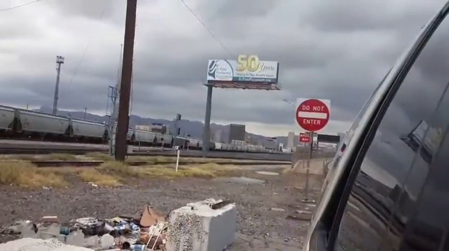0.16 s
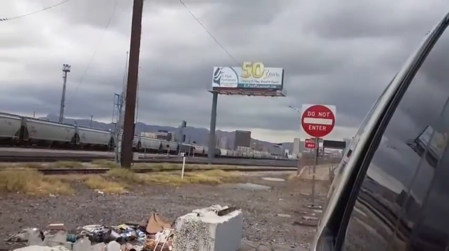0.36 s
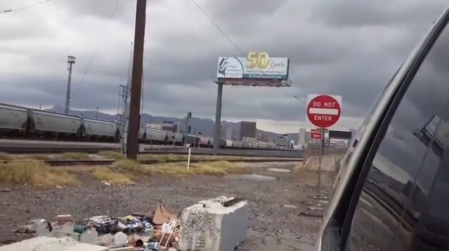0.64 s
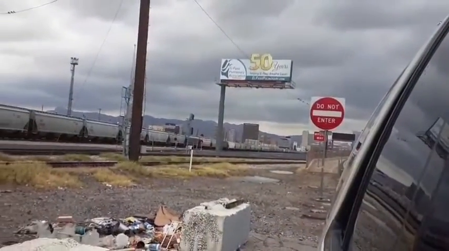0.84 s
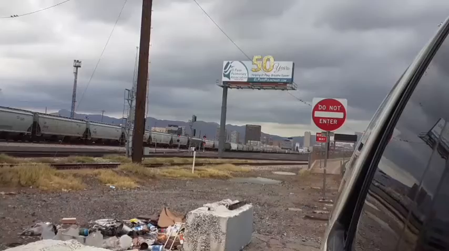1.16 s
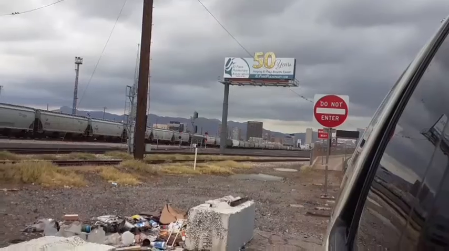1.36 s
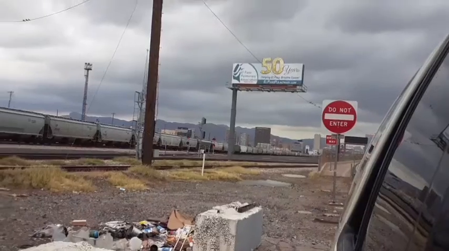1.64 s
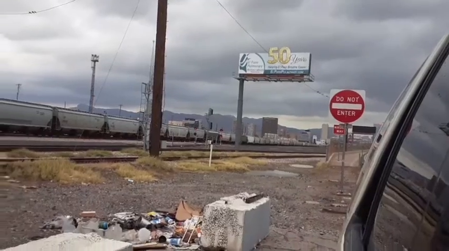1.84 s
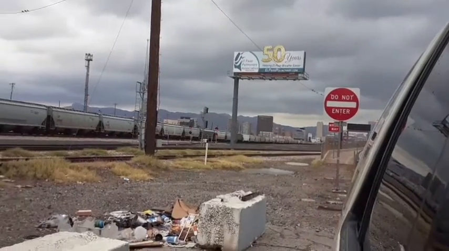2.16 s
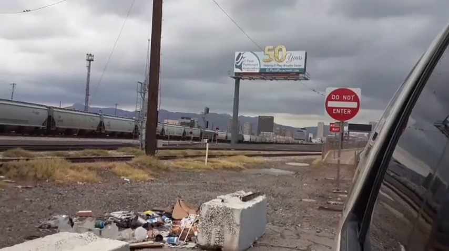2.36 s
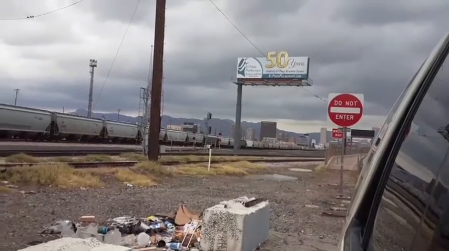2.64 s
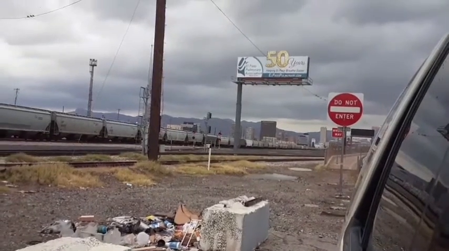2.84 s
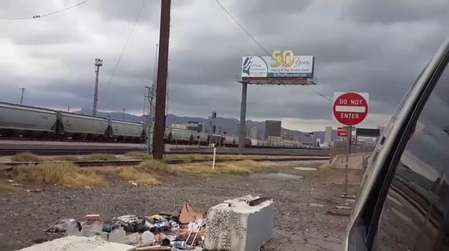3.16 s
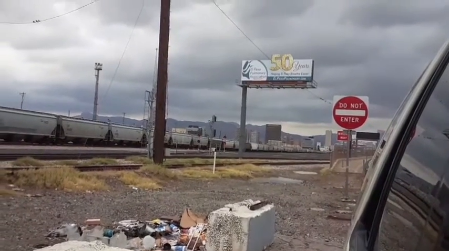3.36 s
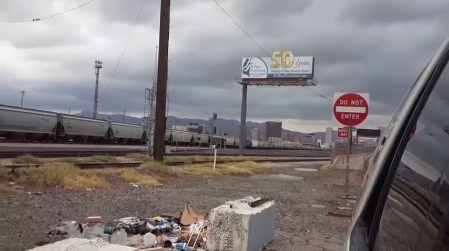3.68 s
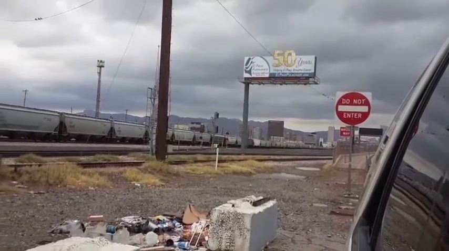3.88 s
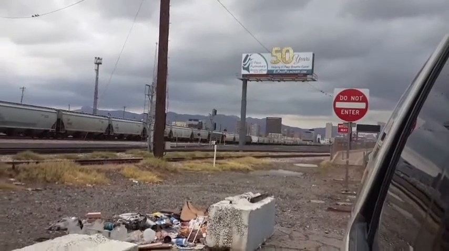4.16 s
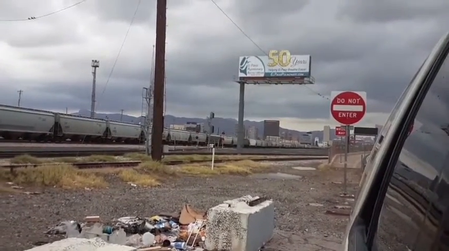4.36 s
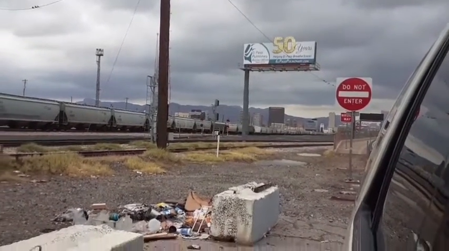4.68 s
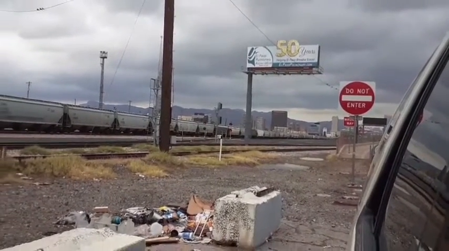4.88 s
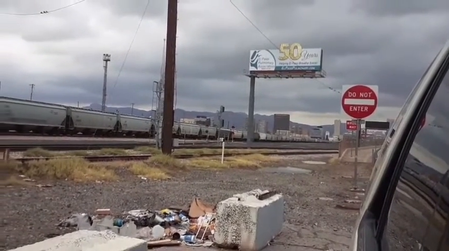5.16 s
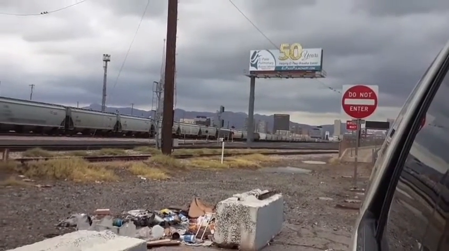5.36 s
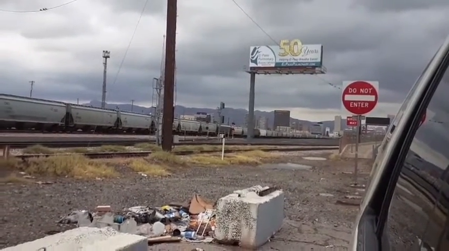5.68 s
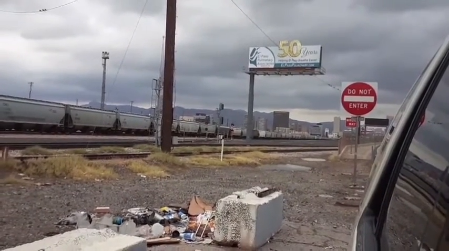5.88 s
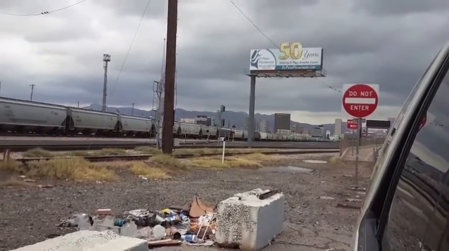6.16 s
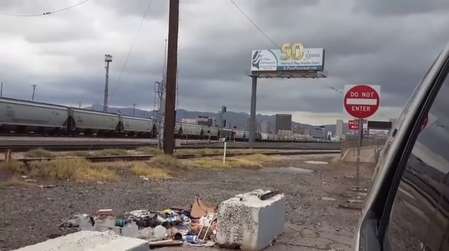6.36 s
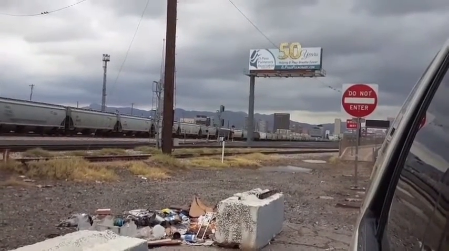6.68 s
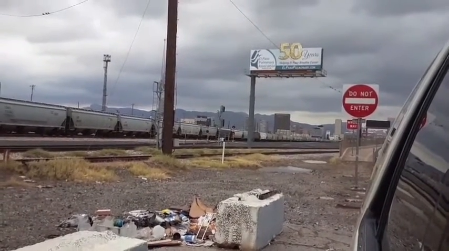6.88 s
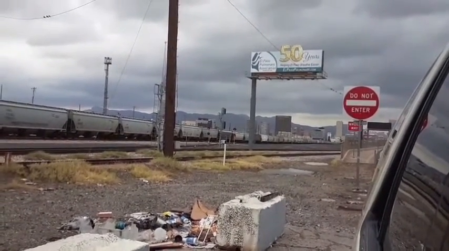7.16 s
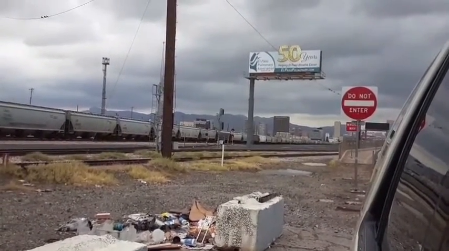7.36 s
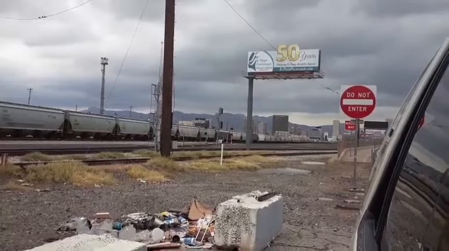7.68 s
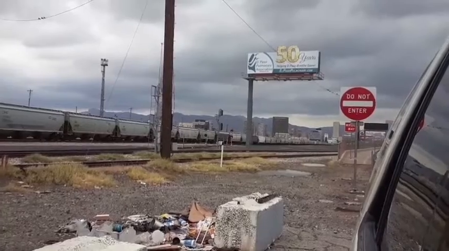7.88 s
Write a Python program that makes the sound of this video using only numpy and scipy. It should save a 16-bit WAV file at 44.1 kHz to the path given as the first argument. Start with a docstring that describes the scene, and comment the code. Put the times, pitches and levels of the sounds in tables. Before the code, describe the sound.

A freight train rolls slowly by with a high, steady wheel squeal, over a low rumble and light wind on the microphone.

```python
"""Freight train wheel squeal

A long freight train rolls slowly through a yard, heard from the open window of a car. Stick-slip
friction drives one wheel into a high, steady squeal that turns rough as its flange grinds; other
wheels ring and chirp faintly. Under it lie the rolling noise of the wagons, turbulent gusts on
the microphone and, at first, the fading hum of the car's engine."""
import sys
import numpy as np
from scipy import signal
from scipy.fft import rfft, irfft, next_fast_len
from scipy.io import wavfile
from scipy.ndimage import uniform_filter1d

SR = 44100
rng = np.random.default_rng(int(sys.argv[2]) if len(sys.argv) > 2 else 0)


def put_to_file(sound):
    """Save the sound as 16-bit audio at rate SR, in the file named by the first command-line argument."""
    columns = np.atleast_2d(sound).T  # one column per channel
    safe = np.clip(columns, -1, 1)
    whole_steps = np.round(safe * 32767)
    wavfile.write(sys.argv[1], SR, whole_steps.astype(np.int16))


N = 354117
TIME = np.arange(N) / SR

# rubbing of the flange on the rail: t/s, relative level/dB
FLANGE_RUBBING = [(0, -60), (0.7, -53), (1.35, -57.5), (1.7, -59), (2.05, -58), (2.4, -63), (2.88, -61),
                  (3.0, -56.5), (3.15, -62.5), (3.42, -62.5), (3.58, -54), (4.0, -62.0), (4.3, -60.5),
                  (5.05, -51.5), (5.65, -56), (6.2, -50.5), (6.5, -52), (6.85, -53.5), (7.4, -58.0),
                  (8.03, -67.5)]
# coherence of the train's noise between the ears: f/Hz, coherence (0-1)
EAR_COHERENCE = [(50, 0.1), (300, 0.46), (700, 0.76), (1400, 0), (3000, 0.18), (7000, 0.19), (15000, 0.6)]


def squeal():
    """Self-excited vibration: stick-slip locks onto one wheel mode; rough slip adds a subharmonic."""
    # three bouts of squeal, each swelling and dying away: t/s, relative level/dB
    first_bout = [(0, -39), (0.23, -35), (0.28, -25.5), (0.8, -37.5), (1.0, -22.5), (1.45, -19),
                  (1.72, -25), (2.15, -20), (2.4, -34.5), (2.68, -50), (2.89, -41)]
    second_bout = [(2.97, -27), (3.6, -25), (3.8, -32), (4.0, -34.5), (4.12, -36), (4.37, -34.5)]
    third_bout = [(4.42, -32.5), (4.72, -22), (5.33, -28.5), (5.44, -34), (5.88, -32.5), (5.95, -28.5),
                  (6.38, -20.5), (6.48, -29), (6.65, -18.5), (7.28, -30), (7.58, -34.5), (7.66, -41),
                  (8.03, -54.5)]
    # unevenness of the slip: t/s, roughness (0-1)
    slip_roughness = [(0, 1), (.6, 0.7), (.85, 0.48), (1.05, 0.26), (1.45, 0.13), (2.2, 0.26), (2.45, 0.61),
                      (2.85, 0.6), (3.0, 0.19), (3.35, 0.23), (3.6, 0.54), (4.2, 0.49), (4.85, 0.4),
                      (5.3, 0.53), (6.3, 0.38), (6.8, 0.59), (7.5, 0.55)]
    # wandering phase of the squeal between the ears: t/s, lead of the left ear/rad
    ear_phase = [(0, 2.5), (.7, -.5), (1.15, 1.32), (1.27, 0.65), (1.9, 0.73), (3.0, 0.46), (3.6, 0.8),
                 (4.2, 0.56), (4.55, 0), (4.85, -1), (5.2, -2), (5.8, -0.5), (6.05, 2), (6.4, 1.3),
                 (6.65, 3.5), (7.3, 1.55), (8.03, -0.5)]
    mode_hz, wobble_hz, ceiling_db = 4522, 2.2, -13
    level_db, = curves(first_bout + second_bout + third_bout)
    rubbing_db, = curves(FLANGE_RUBBING)
    rough, = curves(slip_roughness)
    lead, = curves(ear_phase)
    flare_db, octave_db, half_db, fifth_db = flange_bites()

    def growth(db, per_level, per_rubbing, per_rough):
        """Nonlinear friction: a partial's gain follows the wheel's swing, rubbing and roughness."""
        change_db = per_level * (level_db + 24) + per_rubbing * (rubbing_db + 57)
        return amp(db + change_db + per_rough * (rough - .5))

    octave = growth(octave_db - 51.5, per_level=.66, per_rubbing=1.16, per_rough=-2)
    half = growth(half_db - 53.5, per_level=.28, per_rubbing=.97, per_rough=7)
    fifth = growth(fifth_db - 60, per_level=-.2, per_rubbing=2.64, per_rough=.5)

    turns = np.cumsum(mode_hz + wobble_hz * flutter(2.18, steep=1.46).real) / SR
    lead = lead + .7 * rough * flutter(4, steep=3).real
    ear_turns = turns + np.array([[.5], [-.5]]) * lead / (2 * np.pi)
    tone_rough = np.minimum(rough * 1.1, .8)
    tone = partial(ear_turns, tone_rough, width_hz=18, scatter=.75, steep=2.3, cap=.5, window=4000)
    swing_db = np.minimum(level_db + 5 + flare_db, ceiling_db) + grip_loss(rough)
    fundamental = amp(swing_db) * tone * panned(4.5)

    second = partial(2 * turns, rough * 2, width_hz=18, scatter=.5, steep=1.4)
    third = partial(3 * turns, rough * 2, width_hz=16, scatter=.4, steep=1.6)
    harmonics = octave * (second + amp(-7) * rough * third) * panned(1.8)

    # the half pitch and its odd multiples
    sputter = amp(2.2 * flutter(22, steep=3).real)
    odd = half * sputter * partial(turns / 2, .92, width_hz=11, scatter=.3, steep=1.25, window=12000)
    odd += fifth * partial(1.5 * turns, .92, width_hz=11, scatter=.5, steep=1.4) * panned(3)
    odd += fifth * amp(-10.5) * partial(2.5 * turns, .95, width_hz=14, scatter=.4, steep=1.6)
    return fundamental + harmonics + odd


def partial(turns, rough, width_hz, scatter, steep, cap=0, window=9000):
    """Interference: a tone modulated by rough slip meets wagon echoes that differ at each ear."""
    rough = np.clip(rough, 0, 1)
    direct = np.sqrt(1 - rough ** 2) + rough * flutter(width_hz, steep)
    echoes = np.array([flutter(width_hz * 1.45, steep) for ear in range(2)])
    envelope = direct + scatter * rough * echoes
    envelope /= np.sqrt(1 + abs(cap * envelope) ** 2)  # friction caps a wide swing
    power = uniform_filter1d((abs(envelope) ** 2).mean(0), window)
    envelope /= np.sqrt(power + 1e-3)  # the rubbing, not the flutter, sets the loudness
    return np.sqrt(2) * (envelope * np.exp(2j * np.pi * turns)).real


def flange_bites():
    """Transient forcing: each bite briefly shifts the levels of the tone and its partials, in dB."""
    # t/s, half width/s, level change/dB at 1, 2, 1/2 and 3/2 times the squeal frequency
    bites = [(0.588, 0.031, 5, 10, 10, 8), (0.686, 0.038, 4, 0, 0, 5), (0.722, .13, 13, 6, 12, -3.5),
             (0.893, 0.026, 9, -14, 4, -3), (1.023, 0.045, 6, -10, 0, -16),
             (1.373, .11, 1, 10.5, -0.5, -1.5), (2.118, 0.04, 13, -5, -6, -6),
             (3.042, 0.074, 5.5, 6.5, 2, 10), (3.523, 0.033, 4.5, 3, 5, 8), (3.622, 0.017, 3.5, 1, 3, -6),
             (3.971, 0.05, 8.5, -3, 9.5, 0), (4.425, 0.036, 5.5, 10, 0, 12),
             (4.577, 0.072, -2.5, 3, 12, 11), (4.847, 0.026, 11, 3, 3, 0), (5.075, 0.039, 6, -8, 11.5, -4),
             (5.25, 0.063, 8, -3, 8.5, 0), (5.377, 0.032, 3.5, -3, 13.5, -6), (5.957, 0.015, 6, 2, 2, 3),
             (6.14, 0.062, 6, 8, -1, -2), (6.278, 0.019, 7, -1, 6, -11), (6.386, .025, 3.5, 2.5, -10, -6),
             (6.818, 0.04, 3, 6, 0, 8), (6.877, 0.013, 7, 3, 1, 1), (7.159, 0.021, 8, 2, 6, 8),
             (7.253, 0.041, 2.5, -2, 0, -2)]
    return sum(np.outer(lifts, np.exp(-((TIME - t) / width) ** 2)) for t, width, *lifts in bites)


def grip_loss(rough):
    """Interrupted excitation: the tone dips, in dB, at each loss of grip and stutters in rough slip."""
    # the wheel loses its grip and catches again: t/s, depth/dB
    grip_breaks = [(0.654, 9.5), (.8, 8), (1.19, 7), (2.335, 14), (3.447, 13), (3.593, 25), (4.38, 18),
                   (4.836, 19), (5.119, 14), (5.9, 7), (6.007, 10), (6.238, 12), (6.44, 15), (6.776, 15),
                   (6.852, 14), (6.974, 11), (7.126, 8), (7.319, 24), (7.404, 11)]
    breaks_db = sum(db * notch(t, fall_s=.014, rise_s=.014) for t, db in grip_breaks)
    rough_threshold, mean_stutter_db = .3, 8
    stutters_per_s = 17 * (rough - rough_threshold)
    chance, depth = rng.random((2, N))
    stutters = (chance < stutters_per_s / SR) * (.5 + depth)
    dip = notch(.018, fall_s=.006, rise_s=.016)[:SR // 10]
    return -breaks_db - mean_stutter_db * signal.oaconvolve(stutters, dip)[:N]


def flange_scrape():
    """Resonance: broadband friction at the flange stirs the wheel's other modes, which ring in turn."""
    # lower and upper wheel modes: f/Hz, bandwidth/Hz, relative level/dB
    lower_modes = [(2195, 40, 7), (2300, 110, 7), (2660, 90, 4), (3461, 12, 7), (4380, 120, 11),
                   (4667, 16, 19), (4786, 16, 13), (5227, 50, 7), (5680, 150, 3), (5949, 25, 8),
                   (7340, 100, 5), (7754, 40, 10), (7966, 16, 11)]
    upper_modes = [(8740, 130, 7), (8880, 60, 9), (9200, 160, 5), (9482, 40, 8), (9820, 170, 6),
                   (10600, 120, 1), (11170, 200, 4), (11780, 130, 5), (12258, 25, 5), (12520, 200, 0),
                   (13400, 110, 6), (14680, 200, -1)]
    # broadband part of the rubbing: f/Hz, relative level/dB
    friction_spectrum = [(1500, -21), (2500, 2), (4500, -1), (6200, -0.5), (8000, -2.5), (10500, -8),
                         (13000, -3), (16000, -12)]

    def colour(hz):
        """Power summation: Lorentzian resonance peaks stand on the friction spectrum."""
        peaks = sum(amp(db) ** 2 / (1 + (2 * (hz - f) / width) ** 2)
                    for f, width, db in lower_modes + upper_modes)
        return np.sqrt(peaks + amp(spectrum(friction_spectrum, hz)) ** 2)

    level_db, = curves(FLANGE_RUBBING)
    scrape = noise(colour, lambda hz: spectrum(EAR_COHERENCE, hz))
    frames = signal.stft(scrape, nperseg=2048)[2]
    # random patches in frequency and time favour one mode, then another
    patches = uniform_filter1d(rng.standard_normal(frames.shape[1:]), size=3, axis=0)
    patches = unit_rms(uniform_filter1d(patches, size=7, axis=1))
    ringing = unit_rms(signal.istft(frames * amp(5 * patches), nperseg=2048)[1][:, :N])
    chatter_db = 2.1 * flutter(18).real
    return amp(level_db + 6.5 + chatter_db) * ringing * panned(1.8)


def other_wheels():
    """Friction-excited modes: faint rings swell and die as other flanges touch the rail."""
    # start t/s, end t/s, centre f/Hz, glide/Hz, flutter width/Hz, relative peak level/dB
    rings = [(-.5, 1.2, 2615, 0, 8, -46), (.9, 2.3, 2616, 0, 9, -51), (1.45, 2.0, 2491, 0, 6, -56),
             (2.5, 2.74, 5300, 0, 350, -57), (2.73, 2.83, 2665, 30, 16, -48),
             (4.31, 4.45, 2660, 20, 18, -50), (5.26, 5.4, 2700, 20, 22, -50),
             (6.06, 6.32, 2680, 10, 16, -49), (6.77, 7.3, 2700, 0, 40, -53), (6.98, 7.34, 2491, 0, 6, -51),
             (.2, 2.4, 3983, 0, 5, -58), (4.4, 7.4, 3980, 0, 5, -62), (3.3, 8.6, 4044, 0, 8, -61),
             (5.6, 6.9, 13092, 0, 4, -63)]
    out = np.zeros((2, N))
    for start, end, hz, glide_hz, width_hz, db in rings:
        on = (TIME > start) & (TIME < end)
        progress = (TIME[on] - start) / (end - start)
        carrier = np.exp(2j * np.pi * np.cumsum(hz + glide_hz * (progress - .5)) / SR)
        shared, left, right = (flutter(width_hz)[on] for _ in range(3))
        envelope = unit_rms(shared + 1.4 * np.array([left, right]))
        swell = np.sqrt(2 * np.sin(np.pi * progress))
        out[:, on] += amp(db + 2.5) * swell * (envelope * carrier).real
    return out


def wagons():
    """Incoherent sources: many distant rolling wheels sum to a rumble over the yard's faint hiss."""
    # rolling noise: t/s, relative level/dB
    rolling_level = [(0.0, -37.5), (0.02, -41.5), (0.13, -37.5), (1.45, -44.5), (3.13, -44.5), (4.61, -42),
                     (4.7, -44), (5.48, -40.5), (6.84, -44), (8.03, -42)]
    # its spectral density: f/Hz, relative level/dB
    rolling_spectrum = [(20, -16), (45, -39), (70, -22), (130, -8), (220, -1), (350, 6.5), (550, 3),
                        (850, 4.5), (1080, -1.5), (1300, -2), (1900, -7), (2500, -8), (3200, -18),
                        (4200, -8.5), (6000, -23.5), (16000, -62)]
    # its left-right balance, with the deep bass weak on the left: f/Hz, left minus right level/dB
    balance = [(40, -24), (200, -19.5), (270, -1.5), (340, 10.5), (600, 3.5), (850, 1), (1100, 1),
               (2000, 1), (16000, -3)]
    # hiss of the open yard: f/Hz, relative level/dB
    hiss_spectrum = [(500, -4), (3000, 1.5), (5200, -8), (7000, -5), (16000, -8)]
    level_db, = curves(rolling_level)
    rumble = noise(lambda hz: amp(spectrum(rolling_spectrum, hz)) * panned(spectrum(balance, hz)),
                   lambda hz: spectrum(EAR_COHERENCE, hz), lag_s=.00006)
    hiss = noise(lambda hz: amp(spectrum(hiss_spectrum, hz)), coherence=lambda hz: .7)
    sway_db = 1.6 * flutter(14).real
    return amp(level_db + 4.5 + sway_db) * rumble + amp(-59) * hiss


def wind():
    """Turbulence: low buffeting at each microphone port; gusts swell it and shed brighter eddies."""
    # wind on the microphone, much quieter on the left after about 3 s: t/s, left, right level/dB
    breeze_level = [(0, -22, -22), (.5, -26.5, -28), (.9, -40.5, -27), (1.6, -32.5, -34), (2.5, -33, -31),
                    (3.2, -55, -28.5), (3.5, -48, -28.5), (4.5, -59, -28.5), (5.4, -59, -35.5),
                    (6.4, -62, -36.5), (8.03, -46, -35.5)]
    # spectral densities of buffeting and eddies: f/Hz, relative level/dB
    buffet_spectrum = [(15, -44), (30, -24.5), (48, -16), (64, 3.5), (85, -2), (120, -2.5), (180, -7),
                       (260, -14), (400, -23.5), (800, -57.5), (3000, -65.5)]
    eddy_spectrum = [(30, -18), (100, -7), (200, 2.5), (350, 0), (550, -7), (800, -15), (1500, -34.5),
                     (5000, -64.5)]
    # t/s, half width/s, relative buffet and eddy level/dB, eddy left minus right level/dB
    gusts = [(0.058, 0.016, -37, -26, 6), (0.13, 0.0067, -26, -19.5, 7), (0.25, 0.053, -23, -47, 0),
             (0.475, 0.042, -24, -53, 0), (.74, 0.036, -28, -39, 6), (0.96, 0.014, -48, -27, 6),
             (1.217, 0.017, -29, -40, 2), (2.222, 0.01, -27.5, -59, -2), (2.473, 0.032, -31, -36, 7),
             (2.71, 0.019, -28.5, -54, 2), (2.925, 0.034, -42, -32.5, 7), (3.03, 0.018, -26, -34, 3),
             (3.178, 0.02, -29, -38, 3), (3.733, 0.0086, -27, -24, 42), (3.887, 0.064, -48, -33, 6),
             (4.123, 0.023, -46, -29.5, -2), (4.207, 0.015, -42, -27, 4), (4.282, 0.033, -31.5, -33.5, 5),
             (4.47, 0.073, -50, -30, 2), (4.697, 0.038, -38, -36.5, 8), (4.983, 0.01, -27, -19.5, 2),
             (5.111, 0.018, -28, -28.5, 2), (5.225, 0.0097, -31, -44, 4), (5.527, 0.02, -37, -27.5, -8),
             (5.625, 0.049, -26, -44, 8), (5.839, 0.0087, -28, -22, -2), (5.872, 0.01, -31, -22, -1),
             (6.183, 0.018, -31, -44, -4), (6.684, 0.0089, -33, -29, -18), (6.981, 0.0099, -30, -39, 8),
             (7.17, 0.02, -36, -42, 9), (7.623, 0.018, -35, -50, 0), (7.89, 0.023, -33, -52, 0)]
    linger_s = .0062  # widens each gust's buffet
    left_db, right_db = curves(breeze_level)
    waver_db = .5 * flutter(4, steep=3.1).real
    breeze = amp([left_db + waver_db, right_db])
    lumps_db = 3.5 * flutter(34).real
    buffet_power = breeze ** 2
    eddy_gain = breeze * amp(-14 + 1.93 * lumps_db)
    for t, width, buffet_db, eddy_db, side_db in gusts:
        buffet_power += amp(buffet_db) ** 2 * np.exp(-((TIME - t) / (width + linger_s)) ** 2)
        eddy_gain += amp(eddy_db - 2.7) * panned(side_db) * np.exp(-.5 * ((TIME - t) / width) ** 2)
    buffet = noise(lambda hz: amp(spectrum(buffet_spectrum, hz)), coherence=lambda hz: .77)
    eddies = noise(lambda hz: amp(spectrum(eddy_spectrum, hz)), coherence=lambda hz: .39)
    return np.sqrt(buffet_power) * amp(lumps_db - 1.23) * buffet + eddy_gain * eddies


def car_engine():
    """Periodic excitation: harmonics of the engine's firing rate waver and sink away."""
    # t/s, firing f/Hz, relative level/dB
    firing = [(0, 63, -37), (.3, 63, -32), (.5, 62, -28), (.7, 61, -31), (.85, 61, -39), (1.2, 63, -38),
              (1.5, 63, -46), (2.5, 64, -50), (8.03, 64, -60)]
    # engine orders: multiple of the firing rate, relative level/dB
    orders = [(1, 0), (2, -5), (3, -9), (4, 2), (5, -15), (6, -11)]
    firing_hz, level_db = curves(firing)
    turns = np.cumsum(firing_hz) / SR
    hum = np.zeros(N)
    for order, db in orders:
        waver = 1 + .28 * flutter(4)
        hum += amp(db) * (waver * np.exp(2j * np.pi * (order * turns + rng.random()))).real
    return amp(level_db - 3.7) * hum


def flutter(width_hz, steep=1.23, size=16384):
    """Random modulation: a slow complex envelope that broadens a carrier into a soft-skirted line."""
    hz = np.fft.fftfreq(size, TIME[-1] / size)
    real, imag = rng.standard_normal((2, size))
    envelope = np.fft.ifft((real + 1j * imag) * (1 + (hz / width_hz) ** 2) ** (-steep / 2))
    return np.interp(TIME, np.linspace(0, TIME[-1], size), unit_rms(envelope))


def noise(colour, coherence, lag_s=0):
    """Partial coherence: two-ear coloured noise whose shared part reaches the right ear lag_s later."""
    size = next_fast_len(N, True)
    hz = np.fft.rfftfreq(size, 1 / SR)
    left, independent = rfft(rng.standard_normal((2, size)))
    shared = np.clip(coherence(hz), 0, 1)
    right = shared * left * np.exp(-2j * np.pi * hz * lag_s) + np.sqrt(1 - shared ** 2) * independent
    return unit_rms(irfft(np.array([left, right]) * colour(hz), size)[:, :N])


def notch(t, fall_s, rise_s):
    """Two-sided Gaussian: the depth of a dip, reaching 1 at time t."""
    return np.exp(-((TIME - t) / np.where(TIME < t, fall_s, rise_s)) ** 2)


def panned(db):
    """Interaural level difference: left and right gains at constant power."""
    pair = amp(np.array([[.5], [-.5]]) * db)
    return pair / np.sqrt(np.mean(pair ** 2, 0))


def curves(rows):
    """Linear interpolation of each column of a table in time."""
    times, *columns = np.transpose(rows)
    return [np.interp(TIME, times, column) for column in columns]


def spectrum(points, hz):
    """Linear interpolation on a log-frequency axis."""
    f, value = np.transpose(points)
    return np.interp(np.log(hz + 1), np.log(f + 1), value)


def amp(db):
    """Decibel law: level to amplitude ratio."""
    return 10 ** (np.asarray(db) / 20)


def unit_rms(x):
    """Normalisation to unit mean power."""
    return x / np.sqrt(np.mean(abs(x) ** 2) + 1e-20)


def scene():
    """Superposition: the pressures of train, wind and car add at each ear."""
    return squeal() + flange_scrape() + other_wheels() + wagons() + wind() + car_engine()


def record(dry):
    """Band limiting: a linear-phase low-pass filter removes the highest treble."""
    cutoff_hz = 15780
    taps = signal.firwin(1023, cutoff_hz, window=("kaiser", 9), fs=SR)
    return signal.oaconvolve(dry, taps[None], "same")


dry = scene()
out = record(dry)
put_to_file(out)
```